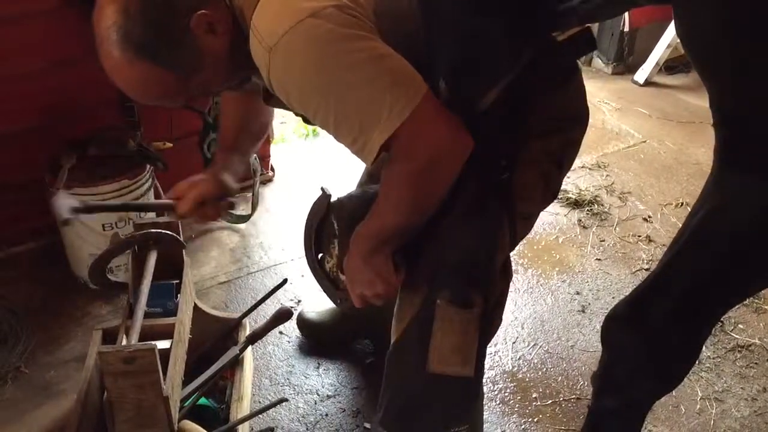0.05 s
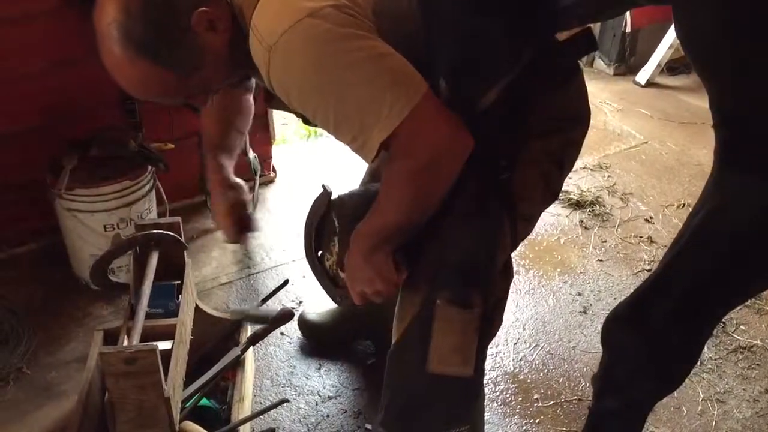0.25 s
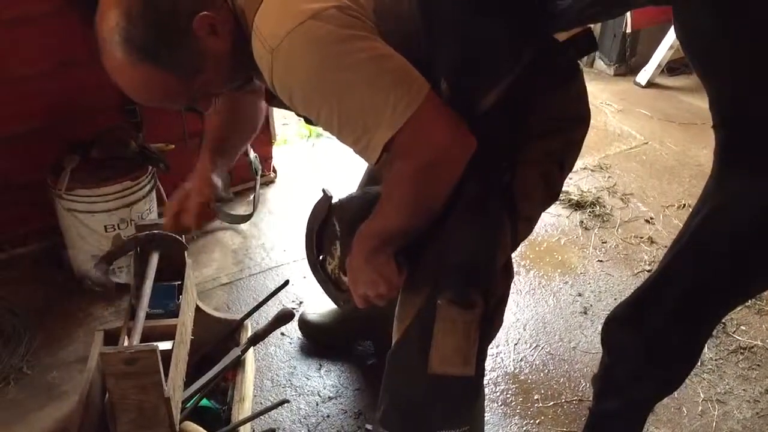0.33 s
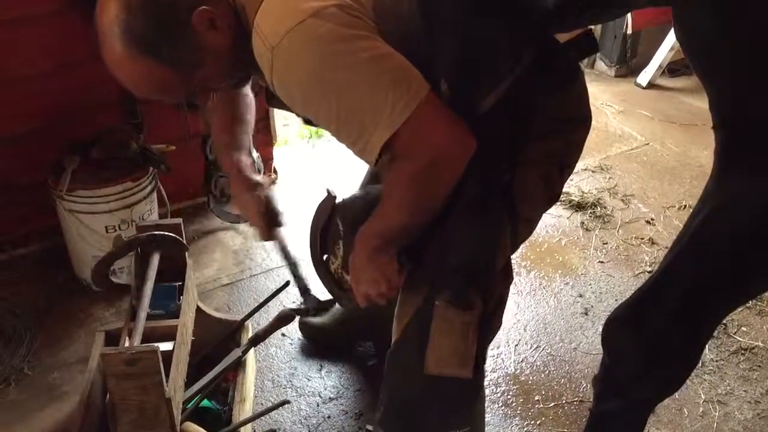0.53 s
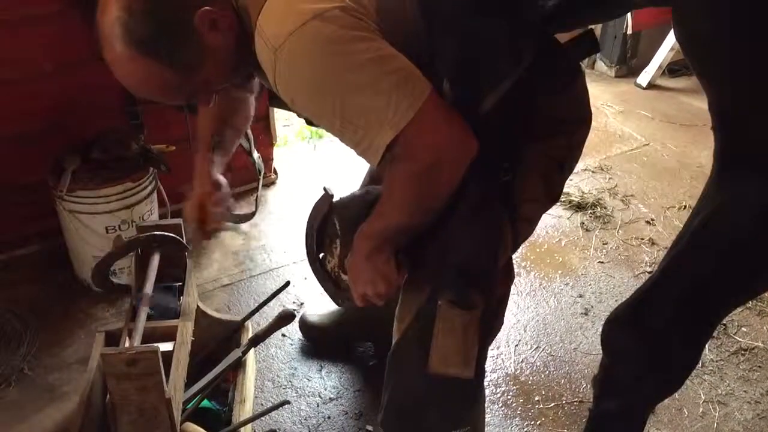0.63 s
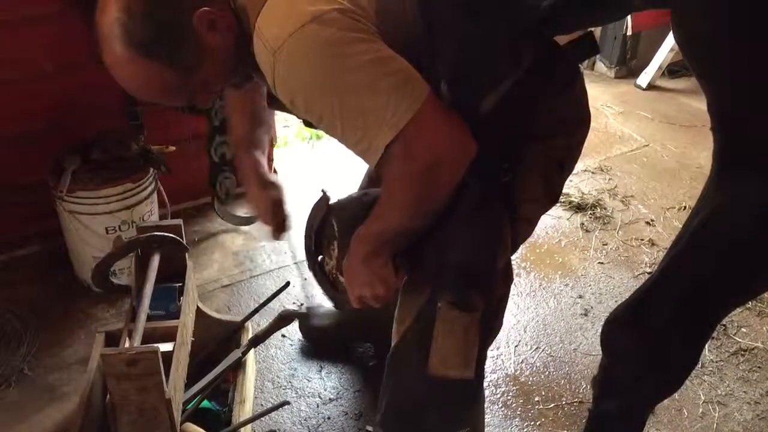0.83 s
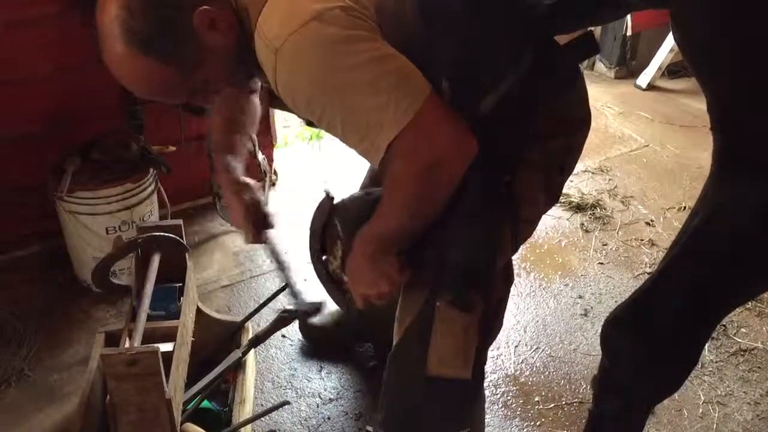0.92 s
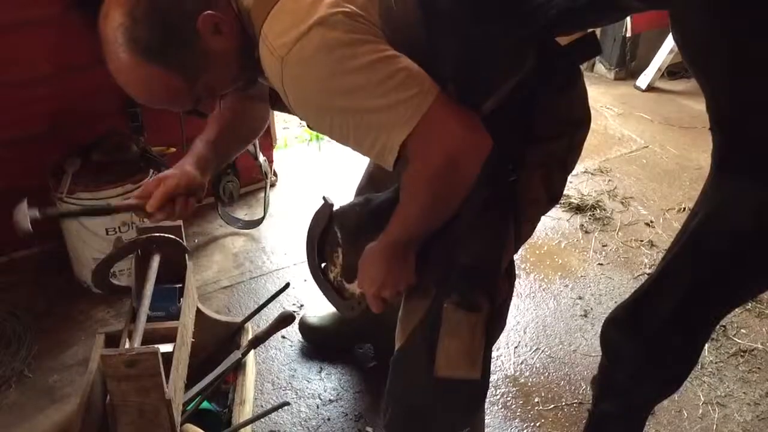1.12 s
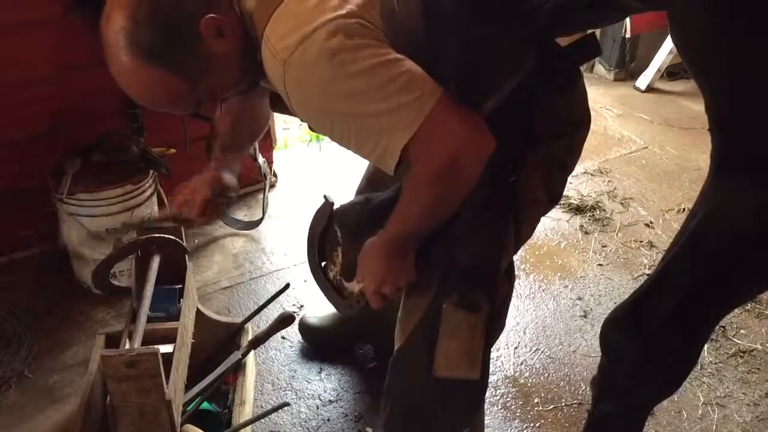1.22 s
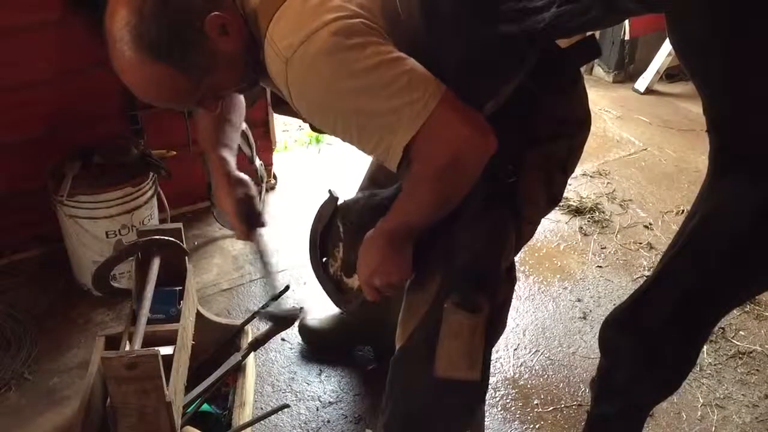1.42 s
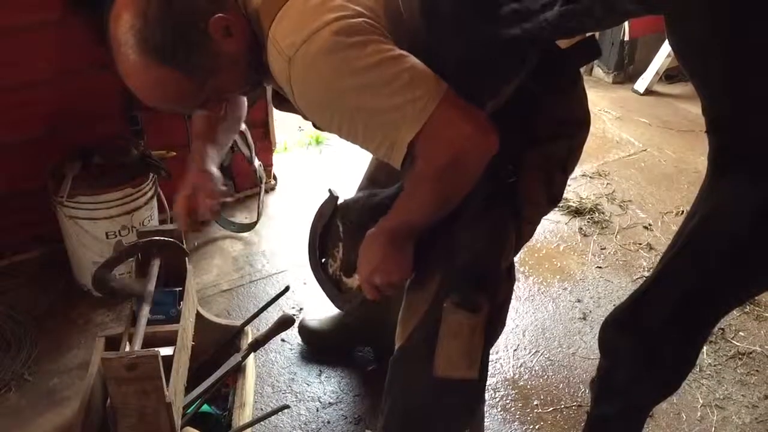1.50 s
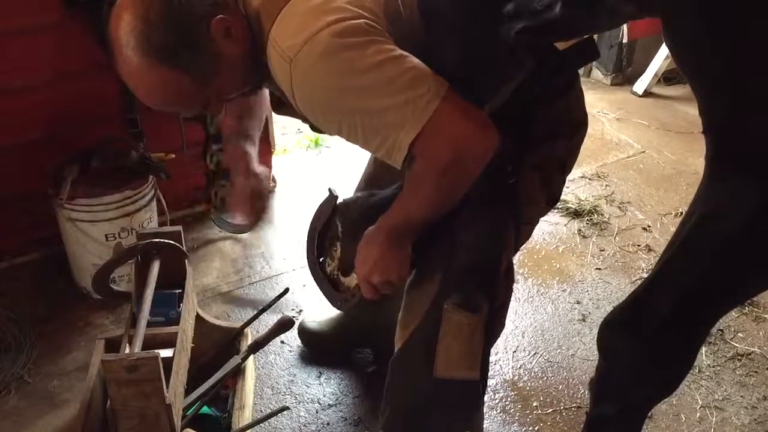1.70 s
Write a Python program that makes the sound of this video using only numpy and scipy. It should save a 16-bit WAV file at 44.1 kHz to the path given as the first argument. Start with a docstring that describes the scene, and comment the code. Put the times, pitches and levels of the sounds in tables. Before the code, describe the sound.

A hammer strikes the nails of a steel horseshoe close by, each blow a sharp crack with a brief metallic ring and short barn echo. One is dying away at the start; others land at about 0.3, 0.6, 1.0 and 1.4 seconds. The hit at 0.6 is hardest and slightly distorted; the last rebounds. Soft microphone bumps and rumble ease after 1 second, then swell near 1.6 over faint air.

```python
"""A farrier hammers the nails of a steel shoe on a horse's hoof, close by in a barn.
One blow is dying away at the start; each cracks, rings shoe and hammer and returns from the walls.
The next lands at 0.27 s, then a light touch and the hardest blow at 0.61 s, overloading the input.
Another follows at 0.96 s, and the soft bumps and rumble of the hand-held microphone ease off.
The last blow rebounds at 1.44 s and the rumble swells again, over the barn's steady air."""
import sys
import numpy as np
from scipy import signal
from scipy.fft import rfft, irfft
from scipy.io import wavfile
from scipy.ndimage import uniform_filter1d

SR = 44100
rng = np.random.default_rng(int(sys.argv[2]) if len(sys.argv) > 2 else 0)


def inscribe(sig):
    """Save sig as 16-bit PCM at rate SR to the path in sys.argv[1].

    A 1-D sig is mono; a 2-D sig holds one channel per row.
    Samples are clipped to [-1, 1] before scaling.
    """
    pcm = np.round(np.clip(np.atleast_2d(sig).T, -1, 1) * 32767)
    wavfile.write(sys.argv[1], SR, pcm.astype(np.int16))


N = 77175

# hammer blows: start_s, crack_db, ring_db, barn_db, tilt_db_per_octave, spot_index
HAMMER_BLOWS = [(-.085, -5, -28, 1, -0.5, 0), (.265, 2, 1.5, 3.5, -0.5, 0),
                (0.590, -27.5, -36, -26, 0.5, 1), (0.6128, 9.5, 0.5, 0, 1.5, 1),
                (0.963, -2, -1.5, -4.5, -1.5, 0), (1.436, -1.5, -3.5, -4.5, -4, 2),
                (1.453, -7.5, -6, -5.5, -2, 2)]


def hammer():
    """Each blow cracks, rings the steel, knocks the hoof and excites the barn."""
    out, t = np.zeros(N), np.arange(SR) / SR
    for start_s, crack_db, ring_db, barn_db, tilt, spot in HAMMER_BLOWS:
        clash = crack(t, crack_db, tilt) + amp(barn_db) * barn_reverb(t, tilt)
        knock = amp(crack_db) * hoof_knock(t)
        add(out, start_s, uneven_colour(clash) + amp(ring_db) * steel_ring(t, spot) + knock)
    return out


# crack spectrum: freq_hz, density_db
CRACK_SPECTRUM = [(100, -24.5), (500, -13.5), (1300, 0), (2400, -6.5), (3400, 6), (4300, 0.5), (5200, -3.5),
                  (11000, -7), (15000, -13.5)]


def crack(t, level_db, tilt, t60_s=0.063, snap_t60_s=0.0051, echo_span_s=0.046):
    """Steel hits steel: a noise burst with a snap at contact and three near echoes."""
    burst = noise(tilted(CRACK_SPECTRUM, tilt), len(t)) * decay(t, t60_s, level_db - 12)
    out = burst * (1 + decay(t, snap_t60_s, 7.5))
    for delay_s in echo_span_s * (np.arange(1, 4) + rng.random(3)) / 4:
        add(out, delay_s, amp(-14) * burst)
    return out


def uneven_colour(x, depth_db=3.2, spacing_hz=90):
    """A fine, uneven colouring: narrow random peaks and dips, deeper in the treble."""
    hz = np.fft.rfftfreq(2 * len(x), 1 / SR)
    ripple = np.interp(hz / spacing_hz, np.arange(1000), rng.standard_normal(1000))
    gain = amp(depth_db * np.cbrt(hz / 3000) * ripple)
    gain /= np.sqrt(uniform_filter1d(gain ** 2, size=1600))
    log_gain = np.log(np.r_[gain, gain[-2:0:-1]])
    minimum_phase = np.exp(np.conj(signal.hilbert(log_gain)))[:len(hz)]
    return irfft(rfft(x, 2 * len(x)) * minimum_phase)[:len(x)]


# modes of shoe and hammer: pitch_hz
MODE_PITCHES = [1370, 1915, 2154, 2597, 3000, 3104, 3772, 4110, 4222, 4280, 4345, 4830, 5322, 6460, 7050,
                7761, 8345, 9835, 10350, 13030, 14350]
# level of each mode by spot struck: spot0_db, spot1_db, spot2_db
MODE_LEVELS = [(-33.5, -42, -28.5), (-31.5, -22, -22.5), (-31.5, -33, -48), (-17.5, -22, -26.5),
               (-25, -35, -27), (-20.5, -36.5, -22), (-41, -24, -27.5), (-26.5, -19.5, -22),
               (-18.5, -16.5, -20.5), (-20.5, -23.5, -21.5), (-24.5, -17, -18), (-48.5, -34.5, -28.5),
               (-30, -11, -32), (-42, -16.5, -23.5), (-29.5, -28, -22.5), (-49, -20.5, -44),
               (-47.5, -40.5, -35), (-39.5, -30, -24.5), (-52, -35.5, -57), (-38, -20, -36),
               (-46, -31, -52)]


def steel_ring(t, spot, waver_share=0.95, waver_hz=46, rattle_hz=170):
    """Steel clangs as the shoe settles, then rings; reflections make it waver, chatter roughens it."""
    out, hz = np.zeros(len(t)), np.fft.fftfreq(len(t), 1 / SR)
    sidebands = 1 / (1 + (hz / waver_hz) ** 2) + amp(-16) / (1 + (hz / rattle_hz) ** 4)
    clang = decay(t, t60_s=0.041, level_db=11.5)
    steady = np.sqrt(1 - waver_share ** 2)
    for pitch_hz, levels_db in zip(MODE_PITCHES, MODE_LEVELS):
        t60_s = 0.25 * (3000 / pitch_hz) ** 0.15
        waver = unit(np.fft.ifft(random_phases(len(t)) * sidebands)) * reflection_buildup(t)
        after_ring = 1 / (1 + (2 * np.log2(pitch_hz / 4400)) ** 2)  # modes near 4.4 kHz linger
        fade = decay(t, t60_s) + after_ring * decay(t, 3.3 * t60_s, -23)
        envelope = (steady + waver_share * waver) * fade + clang
        tone = np.exp(2j * np.pi * (pitch_hz * t + rng.random()))
        out += amp(levels_db[spot]) * (envelope * tone).imag
    return out


# hoof spectrum: freq_hz, density_db
HOOF_SPECTRUM = [(40, -24), (150, 0), (330, -9), (600, -8), (8000, -54)]


def hoof_knock(t):
    """The hoof under the shoe gives a dull knock."""
    return noise(HOOF_SPECTRUM, len(t)) * decay(t, t60_s=0.21, level_db=-29)


# reverb spectrum: freq_hz, density_db
REVERB_SPECTRUM = [(100, -15), (250, -24.5), (450, -5), (780, -5.5), (1020, -.5), (1550, -3), (2000, 4),
                   (3200, 0.5), (4300, -1), (5000, -8), (7200, -6), (9000, -12.5), (14500, -21.5)]
# reverb decay: freq_hz, t60_s
REVERB_DECAY = [(200, 0.19), (1000, 0.32), (2500, 0.27), (5000, 0.3), (8000, 0.28), (14000, 0.24)]


def barn_reverb(t, tilt):
    """Dense wall reflections over a faint longer tail; lows and highs die before the mids."""
    wash = noise(tilted(REVERB_SPECTRUM, tilt), len(t))
    hz, frame_s, bands = signal.stft(wash, SR, nperseg=256)
    t60_s = curve_at(REVERB_DECAY, hz)[:, None]
    tail_t60_s = (t60_s / t60_s.max()) ** 1.1  # 1 s at most
    fade = np.hypot(decay(frame_s, t60_s), decay(frame_s, tail_t60_s, -26))
    reflections = signal.istft(bands * fade, SR, nperseg=256)[1][:len(t)]
    return amp(-14.5) * reflections * reflection_buildup(t)


def reflection_buildup(t, rise_s=0.0049):
    """Reflections take a moment to gather."""
    return 1 - np.exp(-t / rise_s)


# bumps on the microphone: peak_s, half_length_s, level_db, upper_edge_hz
MIC_BUMPS = [(0.029, 0.0048, -18, 192), (0.049, 0.0036, -24.5, 148), (.096, 0.0012, -24, 506),
             (0.097, 0.0056, -18, 148), (0.116, 0.0052, -21.5, 123), (.231, 0.0024, -13, 275),
             (0.245, 0.0066, -15, 213), (0.307, 0.0017, -12, 215), (0.321, 0.0062, -25.5, 284),
             (0.356, 0.01, -16, 268), (0.382, 0.01, -23.5, 350), (0.469, 0.0031, -26, 424),
             (0.566, 0.0036, -18.5, 300), (0.582, 0.0041, -14, 236), (0.599, 0.0052, -14, 234),
             (0.629, 0.019, -24.5, 119.8), (0.729, 0.0022, -29, 288), (0.854, 0.0011, -14.5, 370),
             (.856, 0.012, -20.5, 228), (0.913, 0.013, -26, 250), (1.683, 0.03, -30.5, 169.2)]
# rumble envelope: time_s, level_db
RUMBLE_LEVELS = [(0, -31), (0.152, -36.5), (.22, -28), (0.431, -34.5), (.55, -27), (.75, -38), (.95, -40.5),
                 (1.051, -34.5), (1.15, -46), (1.399, -45.5), (1.52, -43.5), (1.62, -32.5), (1.75, -31.5)]
# rumble spectrum: freq_hz, density_db
RUMBLE_SPECTRUM = [(20, -29.5), (48, 5.5), (75, 7), (120, -3.5), (200, -4), (300, -25.5), (1500, -28.5),
                   (5000, -42.5), (15000, -110)]


def mic_handling(shifts_per_s=20, lower_edge_hz=63.6):
    """Bumps and small random shifts of grip shake the microphone's body, over an uneven rumble."""
    rumble_s, rumble_db = np.transpose(RUMBLE_LEVELS)
    out = noise(RUMBLE_SPECTRUM, N) * amp(np.interp(np.arange(N) / SR, rumble_s, rumble_db))
    shifts = []
    for slot, (jitter, brightness) in enumerate(rng.random((64, 2))):
        peak_s = (slot + jitter) / shifts_per_s
        level_db = np.interp(peak_s, rumble_s, rumble_db) + 1
        shifts.append((peak_s, 0.0057, level_db, 187 * (0.5 + brightness)))
    t, hz = (np.arange(8192) - 4096) / SR, np.fft.rfftfreq(8192, 1 / SR)
    for peak_s, half_length_s, level_db, upper_edge_hz in MIC_BUMPS + shifts:
        band = hz ** 2 / (hz ** 2 + lower_edge_hz ** 2) / (1 + (hz / upper_edge_hz) ** 3.04)
        swell = np.exp(-(t / half_length_s) ** 2 / 2)
        shudder = irfft(band * random_phases(len(hz))) * swell
        add(out, peak_s + t[0], amp(level_db) * unit(shudder) * np.sqrt(np.mean(swell ** 2)))
    return out


# air spectrum: freq_hz, density_db
AIR_SPECTRUM = [(30, 5), (250, 3.5), (500, -3), (2000, -8), (4000, -15.5), (6000, -27.5), (15000, -50)]


def barn_air(level_db=-47.5):
    """The barn's air: a steady, dull hush."""
    return amp(level_db) * noise(AIR_SPECTRUM, N)


def amp(db):
    """Decibels to gain."""
    return 10 ** (np.asarray(db) / 20)


def decay(t, t60_s, level_db=0):
    """Gain falling 60 dB per t60_s from level_db."""
    return amp(level_db - 60 * t / t60_s)


def unit(x):
    """Scales to unit rms."""
    return x / np.sqrt(np.mean(abs(x) ** 2) + 1e-20)


def random_phases(size):
    """Unit phasors at random angles."""
    return np.exp(2j * np.pi * rng.random(size))


def curve_at(points, hz):
    """Interpolates a table on a log-frequency axis."""
    freq_hz, value = np.transpose(points)
    return np.interp(np.log(hz + 1), np.log(freq_hz + 1), value)


def noise(spectrum, size):
    """Shaped noise at unit rms."""
    gain = amp(curve_at(spectrum, np.fft.rfftfreq(size, 1 / SR)))
    return unit(irfft(rfft(rng.standard_normal(size)) * gain, size))


def tilted(spectrum, db_per_octave):
    """Tilts a spectrum about 3 kHz, shelving below 700 Hz."""
    return [(hz, db + db_per_octave * np.log2(max(hz, 700) / 3000)) for hz, db in spectrum]


def add(mix, start_s, sound):
    """Mixes a sound in; start_s may be negative."""
    at = round(start_s * SR)
    sound = sound[max(-at, 0):]
    part = mix[max(at, 0):][:len(sound)]
    part += sound[:len(part)]


def scene():
    """Hammer, handling noise and air, in mono."""
    return (hammer() + mic_handling() + barn_air())[None]


def record(dry, ceiling=0.7, low_cut_hz=30, high_cut_hz=15500):
    """The input overloads softly on the blows, then limits the band."""
    clipped = dry / (1 + (dry / ceiling) ** 4) ** 0.25
    highpass = signal.butter(2, low_cut_hz, "high", fs=SR, output="sos")
    lowpass = signal.firwin(151, high_cut_hz, window=("kaiser", 9), fs=SR)
    return signal.oaconvolve(signal.sosfilt(highpass, clipped), lowpass[None], "same")


dry = scene()
out = record(dry)
inscribe(out)
```